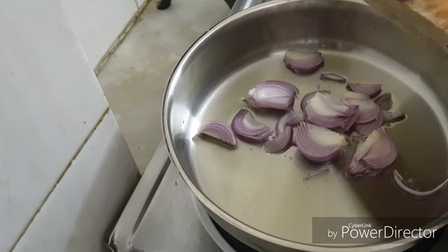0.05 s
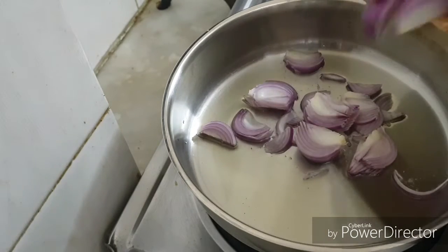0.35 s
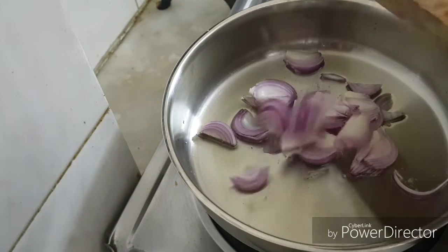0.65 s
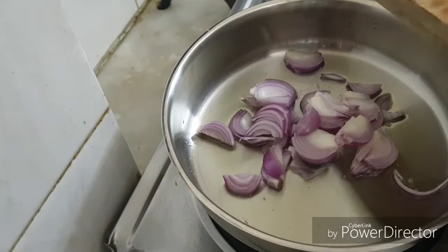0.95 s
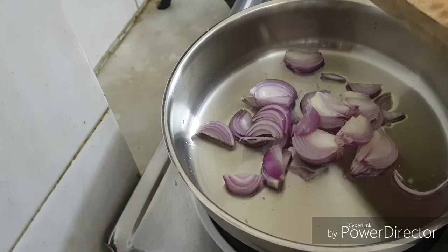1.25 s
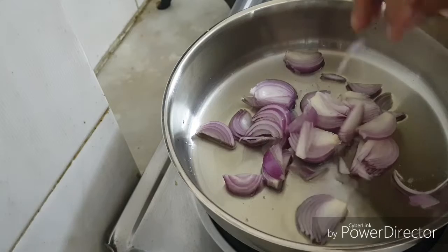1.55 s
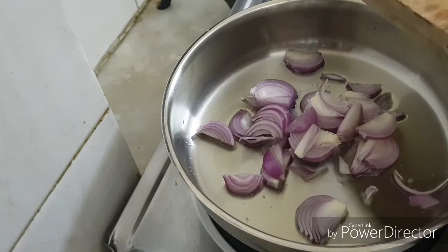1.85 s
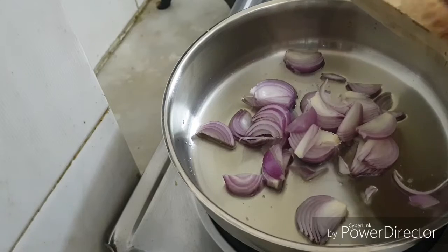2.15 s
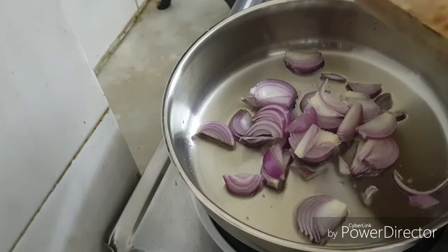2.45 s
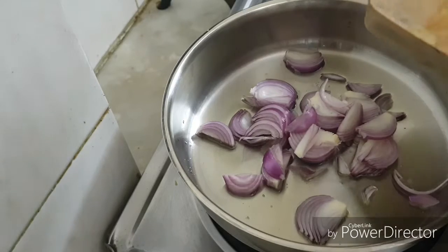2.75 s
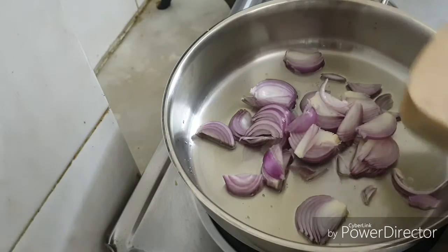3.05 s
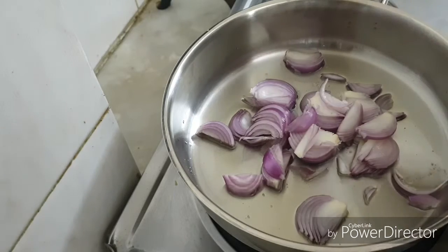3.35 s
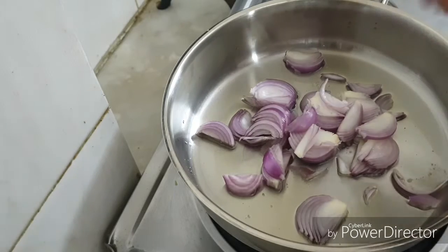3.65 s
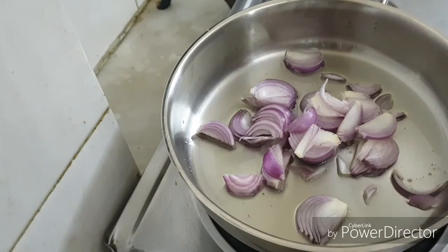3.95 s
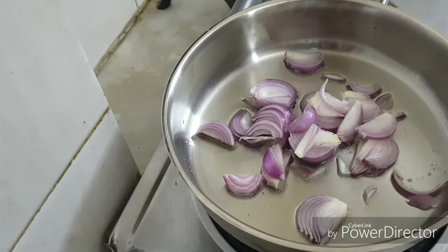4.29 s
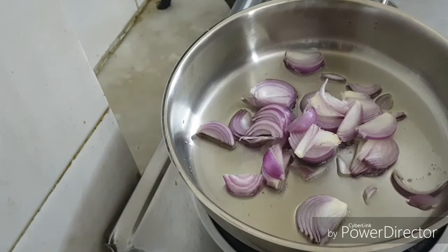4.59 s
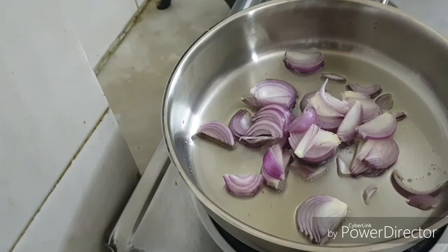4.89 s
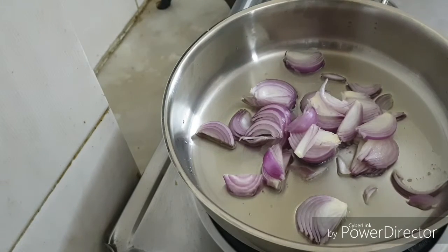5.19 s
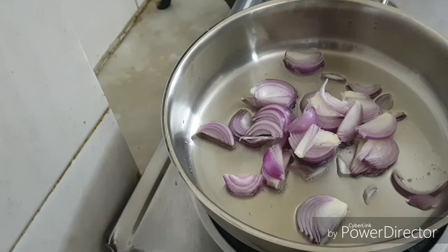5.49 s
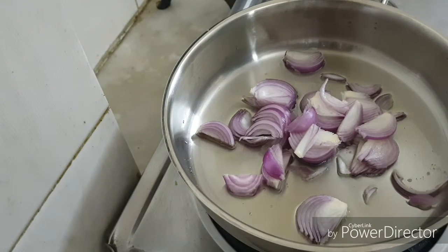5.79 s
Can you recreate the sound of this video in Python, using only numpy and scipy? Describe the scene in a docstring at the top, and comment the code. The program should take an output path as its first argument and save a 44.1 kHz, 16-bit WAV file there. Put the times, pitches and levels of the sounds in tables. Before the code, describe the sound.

Onion slices fry in a steel pan close to the microphone, a fine, crackling sizzle that starts quietly and builds over the first four seconds. A gas flame rumbles and hisses faintly underneath. At about 0.6 seconds a handful of slices tumbles in with soft thuds, a wet patter and several snaps of hot oil, the pan ringing slightly. A second handful lands around 1.6 seconds with one sharp pop. Thin, high hisses of steam run through the frying from about 2 seconds, with a small snap at 3.6. From 4.8 to 5.7 seconds a low drone swells and fades. Slightly to the right, a steel plate taps faintly at 5 seconds, clinks loudly at 5.4, rattles, and is set down on the counter with a clatter at about 5.7. The tiled kitchen adds a short reverberation while the sizzle continues.

```python
"""In a tiled kitchen, onion slices fry in a steel pan close to a two-port microphone.
A gas flame rumbles and hisses, while bursting steam bubbles sum to a sizzle that builds with the heat.
Two more handfuls land with soft thuds, and their water snaps in the hot oil. Near the end a low drone
swells, and to the right a steel plate clinks, rattles and is set down: each impact excites the damped
modes of plate or counter, and the room reverberates."""
import sys
import numpy as np
from scipy import signal
from scipy.fft import rfft, irfft, next_fast_len
from scipy.io import wavfile
from scipy.ndimage import uniform_filter1d

SR = 44100
rng = np.random.default_rng(int(sys.argv[2]) if len(sys.argv) > 2 else 0)


def store_pcm(level_fs):
    """Save levels as 16-bit WAV."""
    pcm = np.round(np.clip(level_fs, -1, 1) * 32767).astype(np.int16)
    wavfile.write(sys.argv[1], SR, np.atleast_2d(pcm).T)


N = 261513
TIME = np.arange(N) / SR
HZ = np.fft.rfftfreq(next_fast_len(N, True), 1 / SR)  # frequency axis for steady sounds
BURST_HZ = abs(np.fft.fftfreq(2 ** 15, 1 / SR))  # frequency axis for transients


def amp(db):
    """Amplitude ratio of a level in decibels."""
    return 10 ** (np.asarray(db) / 20)


def unit(x):
    """Normalisation to rms 1."""
    return x / np.sqrt(np.mean(x ** 2) + 1e-20)


def read(points, hz):
    """Interpolation on a log-frequency axis."""
    knots_hz, values = np.transpose(points)
    return np.interp(np.log(hz + 1), np.log(knots_hz + 1), values)


def add(mix, start_s, sound):
    """Superposition of a sound at a given time."""
    part = mix[round(start_s * SR):][:len(sound)]
    part += sound[:len(part)]


def shape(x, gain):
    """Zero-phase filtering by a gain on HZ."""
    size = next_fast_len(N, True)
    return irfft(rfft(x, size) * gain, size)[..., :N]


def colour(x, db):
    """Spectral shaping of a steady sound; rms 1."""
    return unit(shape(x, amp(db)))


def minimum_phase(x, db):
    """Causal filtering by levels on BURST_HZ: nothing precedes the attack."""
    log_gain = np.log(amp(np.maximum(db, -100)))
    response = np.exp(np.conj(signal.hilbert(log_gain)))
    return np.fft.ifft(np.fft.fft(x, len(BURST_HZ)) * response).real


def whiten(x, bins):
    """Whitening flattens a burst's smoothed spectrum and keeps its course in time; energy 1."""
    power = uniform_filter1d(abs(np.fft.fft(x, len(BURST_HZ))) ** 2, bins, mode="wrap")
    return minimum_phase(x, -10 * np.log10(power + 1e-12))


def drift(rate_hz):
    """Low-pass noise gives a slow random fluctuation; rms 1."""
    return unit(shape(rng.standard_normal(N), (HZ > 0) / (1 + (HZ / rate_hz) ** 2)))


def crack(spectrum_db, decay_s, grit, size=4096):
    """A broadband transient: an impulse trailed by exponentially decaying noise; energy 1."""
    burst = grit * rng.standard_normal(size) * np.exp(-np.arange(size) / SR / decay_s)
    burst[0] = 1
    sound = minimum_phase(whiten(burst, bins=400), spectrum_db)[:size]
    return sound / np.linalg.norm(sound)


def ring(modes, waver=0):
    """Free vibration is a sum of damped modes, alternating in sign; waver is their relative pitch shake."""
    time = np.arange(SR // 2) / SR
    knots = np.linspace(0, time[-1], num=70)
    out = np.zeros(len(time))
    for k, (hz, db, t60) in enumerate(modes):
        t = time[time < t60]
        shake = np.interp(t, knots, rng.standard_normal(len(knots)))
        cycles = hz * (t + waver * np.cumsum(shake) / SR)
        out[:len(t)] += (-1) ** k * amp(db - 60 * t / t60) * np.sin(2 * np.pi * cycles)
    return out


def bursts(per_s, spread_db, mist):
    """Shot noise: bubbles burst at random, a few large, over a Gaussian mist of countless small ones."""
    sizes = amp(spread_db * np.minimum(rng.exponential(1, N), 4)) * rng.choice([-1., 1.], N)
    impulses = unit(sizes * (rng.random(N) < per_s / SR))
    return unit(impulses + mist * rng.standard_normal(N))


# reverberation time of the kitchen: frequency_hz, t60_s
ROOM_DECAY = [(100, 0.62), (400, 0.63), (750, 0.49), (1300, 0.5), (2500, 0.58), (6000, 0.12),
              (14000, 0.087)]
def kitchen(x, wet_db, lag_ms, slot_samples=22):
    """Reverberation: sparse reflections die band by band after the direct sound, which lags on the left."""
    slots = np.arange(SR // 300, SR - slot_samples, slot_samples)
    arrivals = slots + rng.integers(0, slot_samples, (2, len(slots)))
    reflections = np.zeros((2, SR))
    np.put_along_axis(reflections, arrivals, rng.choice([-1., 1.], arrivals.shape), 1)
    hz, t, spectra = signal.stft(reflections, SR, nperseg=256)
    early = 1 + 5.2 * np.exp(-t / 0.0067)  # the hob and the tiled wall answer first
    left, right = spectra * early * np.exp(-np.log(1000) * t / read(ROOM_DECAY, hz)[:, None])
    coherence = np.sinc(hz / 1700)[:, None]  # long waves reach both ports alike
    right = coherence * left + np.sqrt(1 - coherence ** 2) * right
    paths = signal.istft(np.array([left, right]), SR, nperseg=256)[1]
    paths *= amp(wet_db) / np.linalg.norm(paths[0])
    paths[0, round(lag_ms * SR / 1000)] += 1
    paths[1, 0] += 1
    return np.array([signal.fftconvolve(x, whiten(path, bins=45))[:N] for path in paths])


def flame_hiss():
    """The gas flame radiates soft stationary noise, incoherent between the ports."""
    # frequency_hz, level_db
    spectrum = [(300, -13), (900, -6), (1500, 8.5), (2300, 8), (2850, -4), (3700, -7), (7000, 1.5),
                (15000, -25)]
    return amp(-70.5) * np.array([colour(rng.standard_normal(N), read(spectrum, HZ)) for port in range(2)])


# spectrum of the flame's rumble: frequency_hz, level_db
RUMBLE_SPECTRUM = [(15, -41), (25, -9), (48, -9), (64, -10), (80, 4.5), (102, -8), (129, -11), (146, -15.5),
                   (179, -10.5), (321, -20), (388, -16.5), (510, -28), (769, -22.5), (961, -27),
                   (1500, -39.5), (1950, -41), (3300, -120)]
# share of the rumble in antiphase at the ports: frequency_hz, gain_db
RUMBLE_SIDE = [(30, -11), (100, -13.5), (250, -13.5), (500, -2.5), (800, 0), (1500, 3)]
# swells of the rumble around each handful of onions: centre_s, half_length_s
RUMBLE_SWELLS = [(.68, 0.088), (1.62, 0.31)]
def burner():
    """Combustion noise: a low rumble that swells around each handful, with a faint hum."""
    spectrum = read(RUMBLE_SPECTRUM, HZ)
    mid = colour(rng.standard_normal(N), spectrum)
    side = shape(colour(rng.standard_normal(N), spectrum), amp(read(RUMBLE_SIDE, HZ)))
    swell_db = 3 * sum(np.exp(-((TIME - centre_s) / half_s) ** 2) for centre_s, half_s in RUMBLE_SWELLS)
    rumble = np.array([mid + side, mid - side]) * amp(-58.5 + swell_db)
    hum = amp(-64) * unit(np.sin(2 * np.pi * 121 * TIME + 0.59 * drift(rate_hz=2.1)))
    return rumble + hum


# modes of the pan holding oil and onions: pitch_hz, level_db, t60_s
PAN_MODES = [(268, -7, 0.16), (374, -5, 0.22), (469.4, -4, 0.22), (726, -7.5, 0.42), (793, -5.5, 0.35),
             (909, -8.5, 0.23)]
def pan_song(damping_s=1.16):
    """Forced vibration: the flame drives the pan's upper modes, more faintly as the pan fills."""
    drive = rng.standard_normal(N + SR)
    song = unit(signal.fftconvolve(drive, ring(PAN_MODES[3:], waver=0.02), "valid")[:N])
    return amp(-74.5 + 6 * np.exp(-TIME / damping_s)) * song


def drone(start_s=4.82, end_s=5.72, rise_s=0.13, fall_s=0.38, pitch_hz=83):
    """A low tone, wavering by phase modulation, rises, holds and fades."""
    envelope = np.clip(np.minimum((TIME - start_s) / rise_s, (end_s - TIME) / fall_s), 0, 1)
    tone = unit(np.sin(2 * np.pi * pitch_hz * TIME + 0.27 * drift(rate_hz=8.2)))
    return amp(-51.5) * envelope * tone


# spectrum of the plate chattering on the counter: frequency_hz, level_db
CLATTER_SPECTRUM = [(30, -28), (110, 0), (300, -2), (500, -2), (850, 3.5), (1400, 5), (1900, -7),
                    (2150, 10), (2700, -9), (3200, 6), (3600, -4), (4200, -4.5), (5500, -17), (9000, -52)]
def clatter(start_s=5.68, rise_s=0.014, t60_s=0.76, taps_per_s=1500):
    """Repeated impacts: the settling plate makes a dense run of ever smaller taps."""
    t = np.arange(SR // 2) / SR
    taps = rng.standard_normal((3, len(t))) * (rng.random((3, len(t))) < taps_per_s / SR)
    taps *= np.minimum(t / rise_s, 1) * np.exp(-np.log(1000) * t / t60_s)
    paths = np.zeros((3, N))  # common, left, right
    for path, run in zip(paths, taps):
        add(path, start_s, minimum_phase(whiten(run, bins=120), read(CLATTER_SPECTRUM, BURST_HZ)))
    coherence = 1 / (1 + (HZ / 900) ** 2)
    return amp(4.5) * (shape(paths[0], np.sqrt(coherence)) + shape(paths[1:], np.sqrt(1 - coherence)))


# modes of the plate and of the counter: pitch_hz, level_db, t60_s
PLATE_MODES = [(740, -5.5, 0.07), (1292.6, -6, 0.24), (1337, -4, .16), (1355, 1, 0.044), (1403, -5, .08),
               (1455, -14.5, .2), (1633, -12, .07), (1752, -2, 0.071), (1797, -8, .05), (2110, -12, .04),
               (2369, -9, 0.064), (2590, -15, 0.051), (2869, -17, .04), (3176, -14.5, 0.06),
               (3850, -19, .036), (4110, -26, .04)]
COUNTER_MODES = [(155.4, -4, .3), (280, -11, 0.36), (384, -13, .16), (704, -8, 0.22), (850, -3, 0.17),
                 (930, -7.5, 0.13), (1126, -10, 0.11), (1195, -11, 0.18), (1345, -10, 0.15),
                 (1516, -5, .14), (1696, -10, .14), (2086, -16, 0.18), (2160, -13, .3), (2240, -8, 0.34),
                 (2370, -9, 0.12), (3156, -6, 0.15)]
# spectra of their clacks: frequency_hz, level_db
PLATE_SPECTRUM = [(30, -61), (120, -21), (550, -14.5), (740, -8), (1000, -22), (1330, 4), (1600, -1),
                  (2300, 0), (2700, -3.5), (3000, -12), (3170, -5.5), (3550, -15), (3850, -9), (4150, -15),
                  (4700, -21), (9000, -52)]
COUNTER_SPECTRUM = [(30, -42), (70, -7), (120, -7), (250, -11), (480, -11), (900, 1), (1200, 2),
                    (1450, 3.5), (1920, -6), (2150, 6), (2950, -4), (3300, -8), (4100, -12.5),
                    (5200, -14.5), (10000, -80)]
# contacts: start_s, body (0 plate, 1 counter), strength_db, clack_decay_s, low_loss_db_per_octave,
# lowest_mode_ratio, thump_db
CONTACTS = [(5.014, 1, -47, .016, 3, 1.2, -30), (5.022, 0, -50.5, .01, -11, 1.03, -36),
            (5.03, 1, -49.5, .014, 4, 1, -27), (5.3941, 0, -15, 0.00082, 1, 1.015, -14.5),
            (5.3995, 0, -23, .003, 4, 1, -8), (5.421, 0, -26.5, .004, -2, 1, -13),
            (5.444, 0, -27.5, .003, 10, 1, -16.5), (5.483, 0, -30, .004, 6, 1, -21),
            (5.5075, 0, -23.5, .003, 4, 1.06, -12.5), (5.53, 0, -33, .005, -11, 1.06, -15.5),
            (5.55, 0, -32, .005, 4, 1.07, -14.5), (5.672, 1, -27.5, 0.0021, 4.5, 0.87, -12),
            (5.6742, 1, -26, 0.00098, 3, 1.02, -7), (5.6775, 0, -27, .003, 5, 1, -2.5),
            (5.681, 1, -31, 0.004, -0.5, 1, -7), (5.693, 1, -36, .004, 1, 0.92, -5),
            (5.706, 1, -34, 0.0027, 3, 1, -12.5)]
def plate(hardness_db_per_db=1.88, rim_hz=1300):
    """Impact excitation: each contact thumps, clacks and rings; harder ones clack more than they ring."""
    # modes, clack_spectrum, full_clack_strength_db, waver
    bodies = [(PLATE_MODES, PLATE_SPECTRUM, -19.5, .011), (COUNTER_MODES, COUNTER_SPECTRUM, -30, .004)]
    # dull push on the worktop: frequency_hz, level_db
    thump = [(30, -26), (70, -7.5), (145, 4), (230, -5), (400, -7.5), (600, -8.5), (900, -19.5),
             (2000, -50)]
    rings, clacks = np.zeros(N), np.zeros(N)
    for start_s, body, strength_db, decay_s, low_loss, lowest_ratio, thump_db in CONTACTS:
        modes, spectrum, full_clack_db, waver = bodies[body]
        # the point of contact shifts the lowest mode and tilts the levels below rim_hz
        struck = [(hz * (lowest_ratio if k == 0 else 1), db + low_loss * min(np.log2(hz / rim_hz), 0), t60)
                  for k, (hz, db, t60) in enumerate(modes)]
        add(rings, start_s, amp(strength_db) * ring(struck, waver))
        clack_db = hardness_db_per_db * (strength_db - full_clack_db)
        add(clacks, start_s, amp(clack_db) * crack(read(spectrum, BURST_HZ), decay_s, grit=0.91))
        add(clacks, start_s, amp(thump_db) * crack(read(thump, BURST_HZ), decay_s=.003, grit=0.84))
    bass_cut = signal.butter(2, 70, "high", fs=SR, output="sos")  # small bodies radiate no deep bass
    rings, clacks = signal.sosfilt(bass_cut, [rings, clacks])
    impacts = kitchen(rings, wet_db=-7.5, lag_ms=0.31) + kitchen(clacks, wet_db=-0.5, lag_ms=0.3)
    return (impacts + clatter()) * amp([[-.4], [.4]])


# slices landing in the pan: start_s, peak_db, softness_s, plop_hz, pan_ring_db
SLICE_LANDINGS = [(0.6, -47, .0012, 342, 1), (.615, -42.5, 0.0018, 390, -3), (0.66, -39, 0.00054, 232, 1),
                  (.672, -45.5, 0.00033, 873, -5), (.686, -39, 0.00093, 396, -4.5),
                  (0.712, -47, 0.0007, 390, -1), (0.796, -50, .0004, 330, 1),
                  (1.604, -44.5, .002, 463, -11), (1.624, -45.5, 0.0017, 478, -7),
                  (1.643, -48, .002, 470, -18)]
def thuds():
    """Soft impacts ring the pan: the longer the push, the weaker the upper modes."""
    out, pan = np.zeros(N), ring(PAN_MODES)
    t = np.arange(SR // 20) / SR
    for start_s, peak_db, softness_s, plop_hz, pan_db in SLICE_LANDINGS:
        push = np.exp(-t / softness_s)
        plop = ring([(plop_hz, 2.5, .09)])
        thud = signal.fftconvolve(amp(pan_db) * pan + plop, push)
        add(out, start_s, amp(peak_db) * thud / abs(thud).max())
    return out


# spectrum of tumbling wet slices: frequency_hz, level_db
TUMBLE_SPECTRUM = [(200, -20), (700, 3), (1500, 0), (3000, 2), (6000, -7), (14000, -14)]
def patter(start_s=.6, end_s=.86):
    """Shot noise of soft ticks as the first handful tumbles in."""
    arch = np.sin(np.pi * np.clip((TIME - start_s) / (end_s - start_s), 0, 1))
    ticks = bursts(per_s=540, spread_db=4, mist=0.33)
    return amp(-65) * arch * colour(ticks, read(TUMBLE_SPECTRUM, HZ))


# water snapping in the oil: start_s, level_db, pitch_hz, decay_s
WATER_SNAPS = [(0.594, -21.5, 2740, 0.005), (.661, -19, 2600, 0.0037), (.68, -25.5, 2180, .005),
               (.735, -30, 3000, .006), (0.796, -11.5, 6100, 0.0022), (1.558, -19.5, 7400, .003),
               (1.621, -4.5, 4230, 0.0017), (3.615, -21, 12500, .003)]
# spectrum common to the snaps: frequency_hz, level_db
SNAP_SPECTRUM = [(60, -20), (300, 6), (1350, 1.5), (1850, -3), (2300, 4.5), (3150, -5.5), (4050, 4),
                 (7500, 7), (8600, 2.5), (11200, -5), (13000, -11), (16000, -6.5)]
def snaps(splash_delay_s=.002, splash_db=-8.5):
    """Flash boiling: water pops in the hot oil, and each pop throws a duller splash of droplets."""
    pops, splashes = np.zeros(N), np.zeros(N)
    octaves = np.log2((BURST_HZ + 200) / 5000)
    for start_s, db, pitch_hz, decay_s in WATER_SNAPS:
        tilt_db_per_octave = 4.5 * np.tanh(2.6 * np.log2(pitch_hz / 2690))  # higher pops are brighter
        spectrum_db = read(SNAP_SPECTRUM, BURST_HZ) + tilt_db_per_octave * octaves
        resonance_db = 7 * np.exp(-(np.log((BURST_HZ + 1) / pitch_hz) / 0.12) ** 2)
        add(pops, start_s, amp(db) * crack(spectrum_db + resonance_db, decay_s, grit=0.7))
        splash = crack(spectrum_db - octaves, decay_s=0.02, grit=0.62)  # 1 dB per octave duller
        add(splashes, start_s + splash_delay_s, amp(db + splash_db) * splash)
    return pops, splashes


def onions():
    """The transients of the slices arrive both directly and by reflection."""
    landings = thuds()
    pops, splashes = snaps()
    return (kitchen(landings, wet_db=-3.5, lag_ms=0.045) + kitchen(pops, wet_db=-10.5, lag_ms=.07)
            + kitchen(splashes + patter(), wet_db=-1, lag_ms=.07))


def frying_db(body_heat_s=2.63, spray_heat_s=1.44, spent_s=3.88):
    """Exponential heating lifts the sizzle and its fine spray; both ease when trapped steam runs out."""
    spent = np.clip((TIME - spent_s) / 0.049, 0, 1)
    onset_db = -1.5 * np.exp(-(TIME / 0.2) ** 2)
    body_db = -50 - 16.5 * np.exp(-TIME / body_heat_s) - 0.5 * spent
    spray_db = -50.5 - 7.5 * np.exp(-TIME / spray_heat_s) + onset_db - 1.5 * spent
    return body_db, spray_db


def crackles(per_s=70, pitches=16, relative_db=-14):
    """Larger bubbles burst singly, each a damped oscillation of a few cycles."""
    t = np.arange(SR // 200) / SR
    out = np.zeros((2, N))
    for hz in np.geomspace(2800, 12000, pitches):
        tick = np.sin(2 * np.pi * hz * t) * np.exp(-hz * t / 2)
        train = signal.oaconvolve(bursts(per_s / pitches, spread_db=4, mist=0), tick)[:N]
        out += [train, np.roll(train, rng.integers(-6, 7))]  # the delay places it in the pan
    body_db, _ = frying_db()
    return unit(out) * amp(body_db + relative_db)


def bubble_band(hz, width_hz):
    """A resonance confines bubble noise to one soft-edged band; rms 1."""
    resonance_db = -20 * np.log10(1 + ((HZ - hz) / width_hz) ** 2)
    return colour(bursts(per_s=5000, spread_db=5.5, mist=1.0), resonance_db)


# steam squeezing out from under single slices: start_s, end_s, pitch_hz, width_hz, level_db
STEAM_JETS = [(0.35, .52, 9900, 1900, -64.5), (0.517, 0.575, 7380, 200, -61.5),
              (1.833, 3.907, 4670, 150, -64.5), (3.907, 4.9, 4670, 150, -68),
              (2.0, 3.917, 10920, 260, -68.5), (2.35, 3.7, 7600, 500, -66), (3.7, 3.9, 8000, 250, -61)]
def jets(ramp_s=0.008):
    """Narrow-band noise: each pocket of escaping steam hisses in its own band."""
    out = np.zeros(N)
    for start_s, end_s, pitch_hz, width_hz, db in STEAM_JETS:
        gate = np.clip(np.minimum(TIME - start_s, end_s - TIME) / ramp_s, 0, 1)
        out += amp(db) * gate * bubble_band(pitch_hz, width_hz)
    return out


def band_flicker(x, depth_db, size=1024):
    """Random spectral modulation: narrow bands flicker in level, giving a faintly tonal grain."""
    spectra = signal.stft(x, nperseg=size)[2]
    patches = uniform_filter1d(rng.standard_normal(spectra.shape[1:]), size=4, axis=0)
    patches = unit(uniform_filter1d(patches, size=5, axis=1))
    return signal.istft(spectra * amp(depth_db * patches), nperseg=size)[1][:, :N]


# spectra of the sizzle in phase and in antiphase at the ports: frequency_hz, level_db
MID_SPECTRUM = [(650, -47), (1100, -15.5), (1900, -11.5), (2100, -4.5), (2450, -4.5), (2820, 1.3),
                (3500, -1.2), (5100, -1), (5750, -1), (7200, -2), (8800, -9), (11600, -9.5), (12600, -11),
                (15200, -14.5)]
SIDE_SPECTRUM = [(650, -26), (1100, -17), (2000, -23), (2500, -6.5), (2800, -8), (3200, -3.5), (4050, -3.5),
                 (4550, -1.5), (4950, -5.5), (5800, -12), (6700, -6), (9200, -12.5), (10150, -11.5),
                 (15200, -18.5)]
def sizzle(spray_above_hz=8500):
    """Shot noise of bubbles bursting in flurries; a narrow hiss in antiphase at the ports grows with it."""
    body_db, spray_db = frying_db()
    mid = colour(bursts(per_s=5000, spread_db=2.5, mist=1.24), read(MID_SPECTRUM, HZ))
    side = amp(-1) * colour(bursts(per_s=5000, spread_db=3.5, mist=1.1), read(SIDE_SPECTRUM, HZ))
    ports = np.array([mid + side, mid - side])
    spray = shape(ports, 1 / (1 + (spray_above_hz / (HZ + 1)) ** 6))
    body = ports - spray
    antiphase_db = -51 + 1.45 * (body_db - body_db.max())
    antiphase_band = bubble_band(hz=5770, width_hz=220) * amp(antiphase_db) * np.array([[1], [-1]])
    flurry = amp(.3 * drift(rate_hz=15) + .45 * drift(rate_hz=70))
    return (body * amp(body_db) + spray * amp(spray_db) + antiphase_band) * flurry * amp([[.5], [-.5]])


def scene():
    """Linear superposition of all sources at the two ports."""
    frying = band_flicker(sizzle() + jets(), depth_db=2.3) + crackles()
    return frying + burner() + pan_song() + flame_hiss() + drone() + onions() + plate()


def record(dry):
    """Band limiting by a linear-phase low-pass filter."""
    low_pass = signal.firwin(511, cutoff=15520, window=("kaiser", 9), fs=SR)
    return signal.oaconvolve(dry, low_pass[None], "same")


dry = scene()
out = record(dry)
store_pcm(out)
```